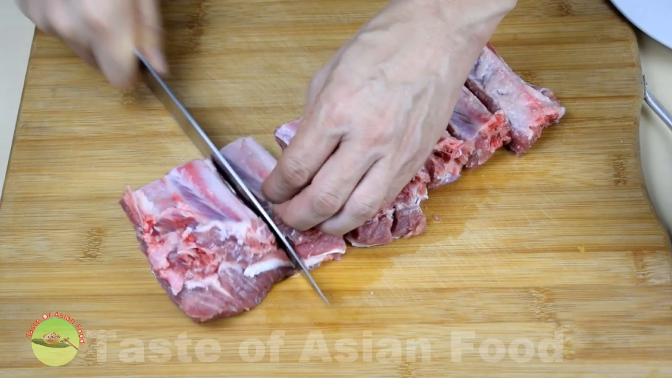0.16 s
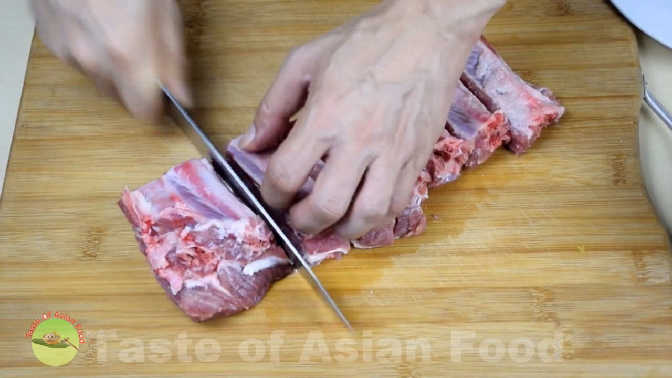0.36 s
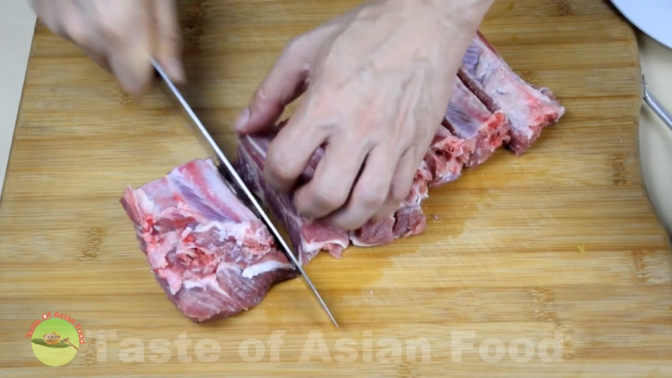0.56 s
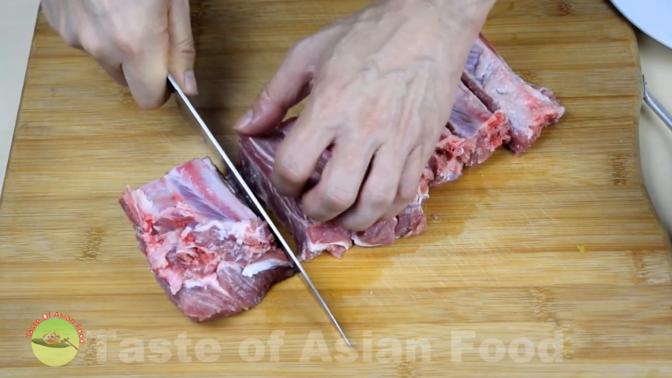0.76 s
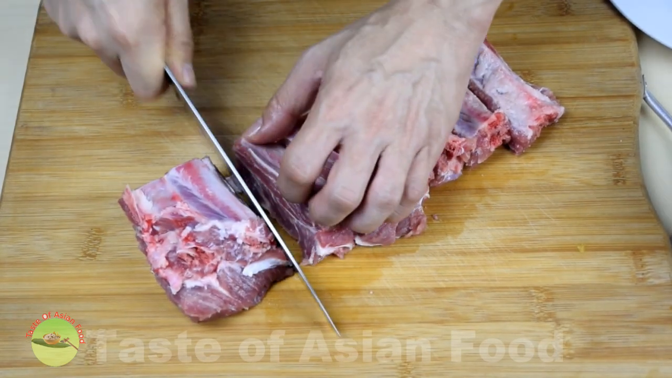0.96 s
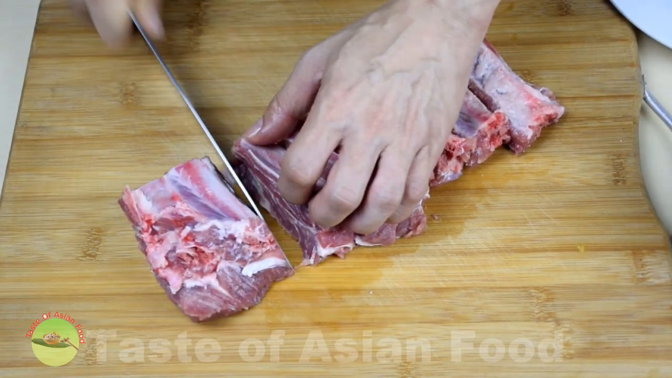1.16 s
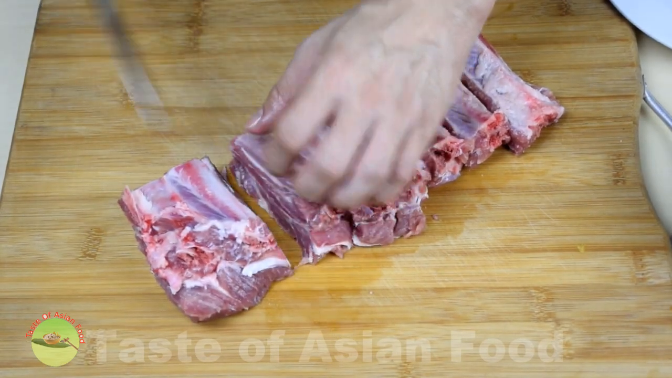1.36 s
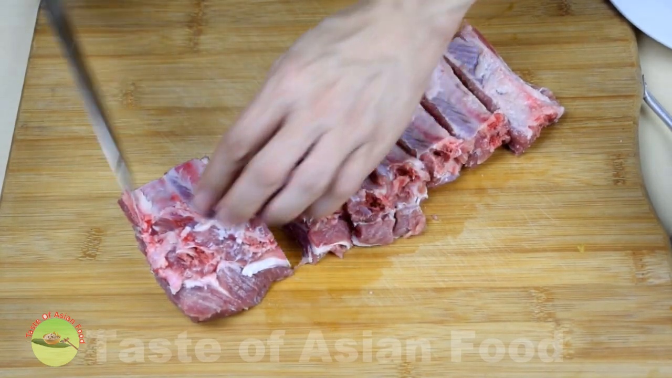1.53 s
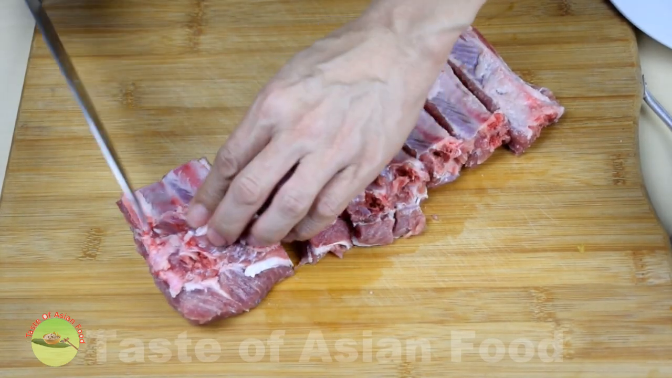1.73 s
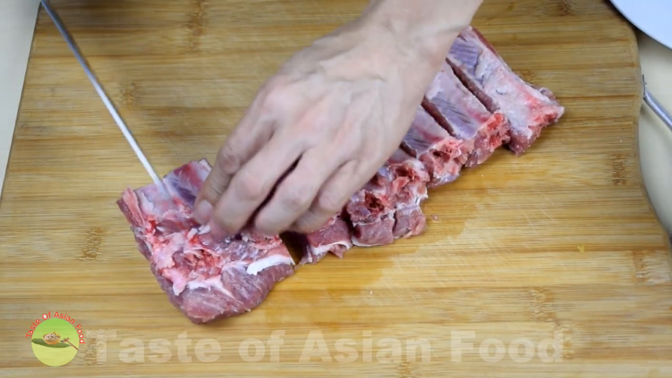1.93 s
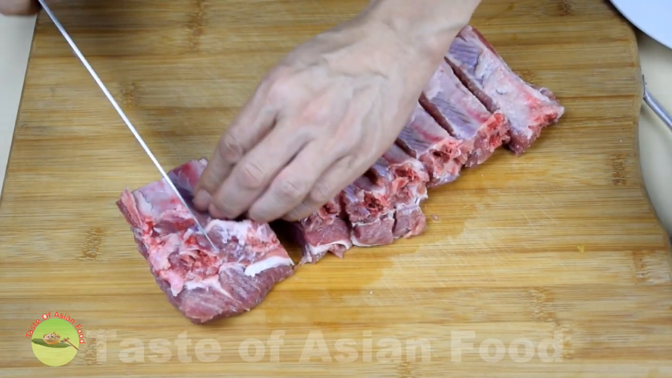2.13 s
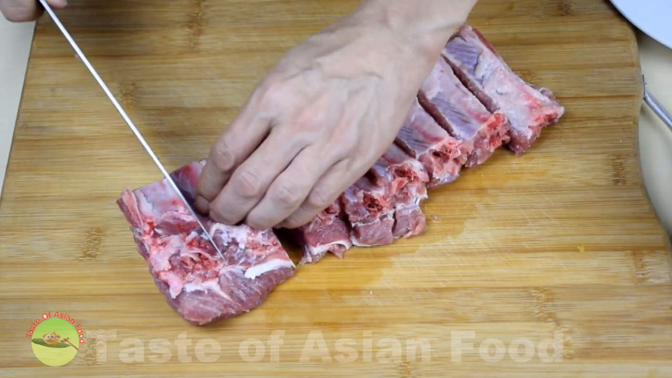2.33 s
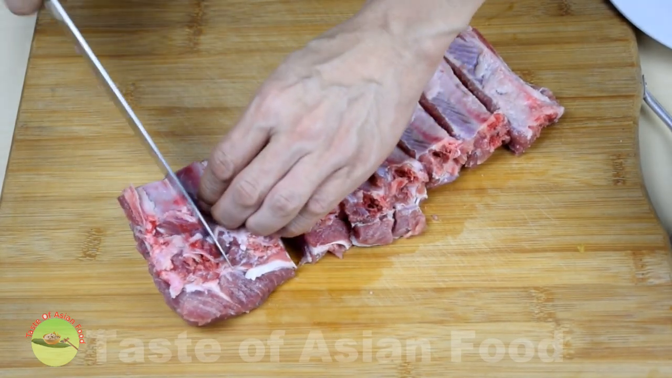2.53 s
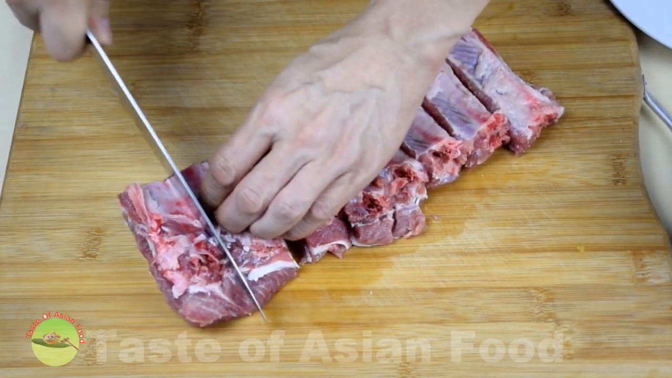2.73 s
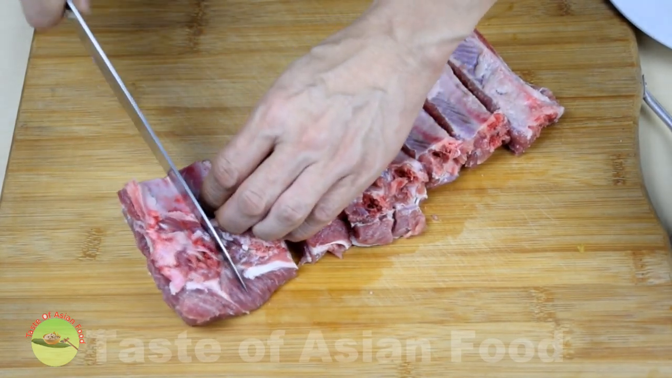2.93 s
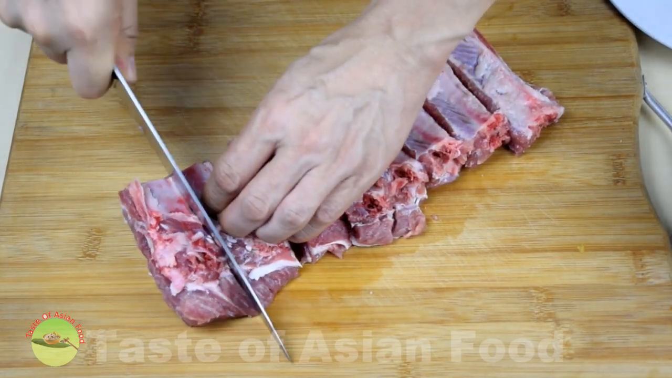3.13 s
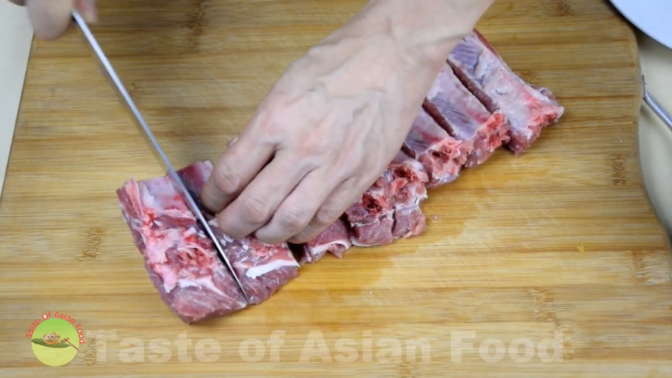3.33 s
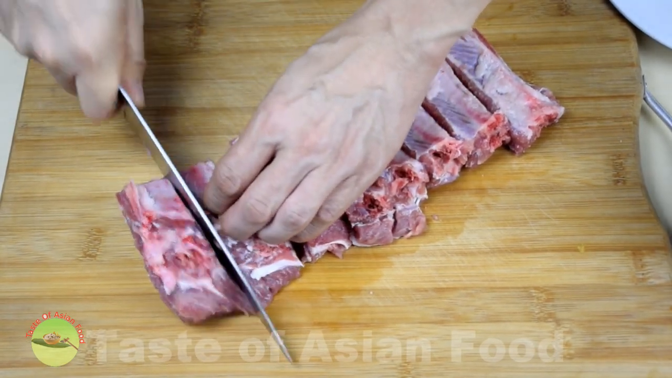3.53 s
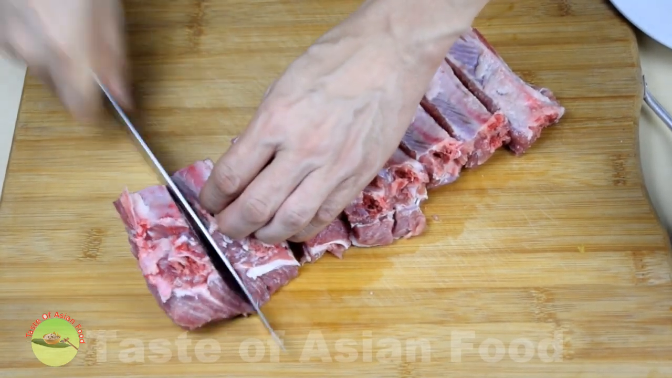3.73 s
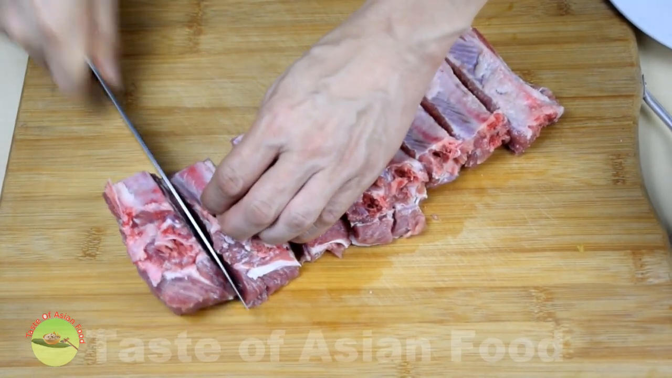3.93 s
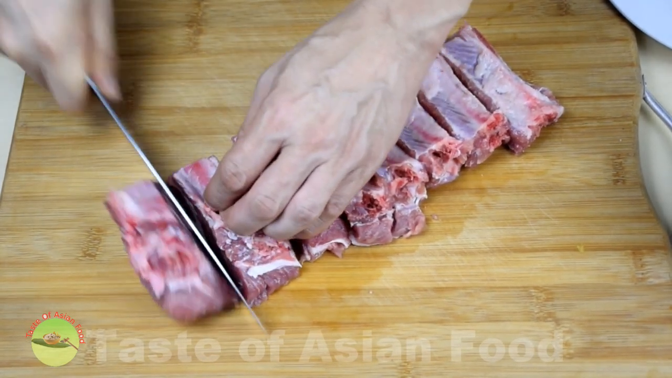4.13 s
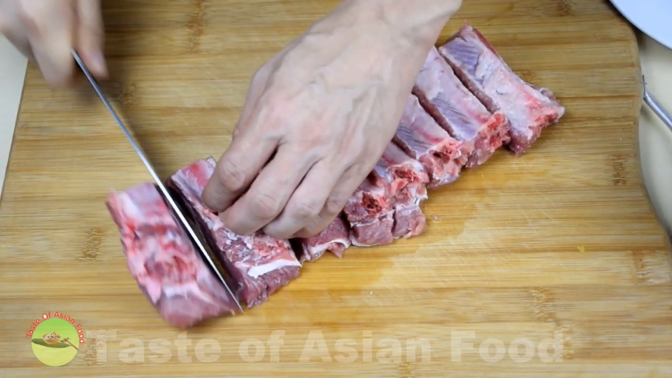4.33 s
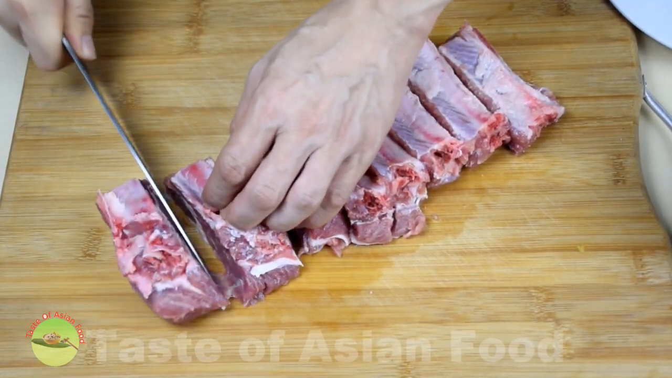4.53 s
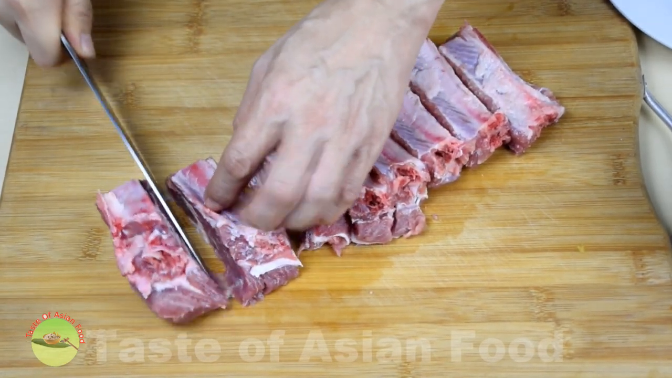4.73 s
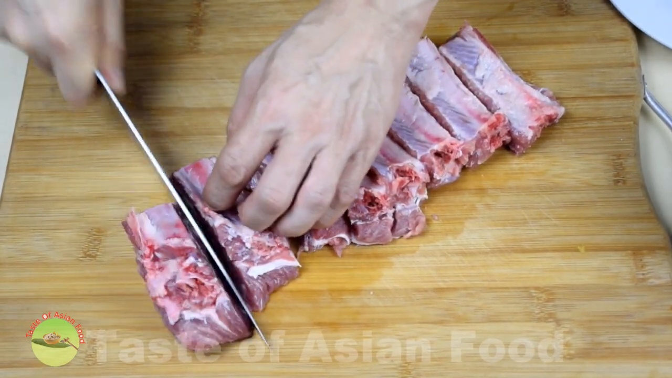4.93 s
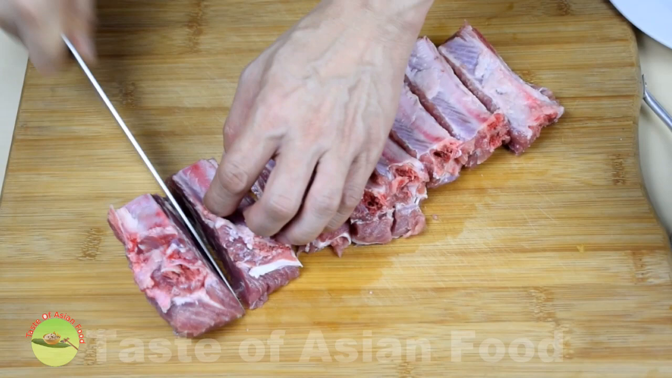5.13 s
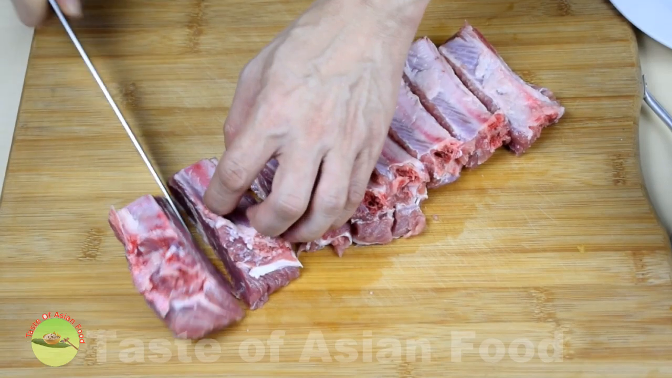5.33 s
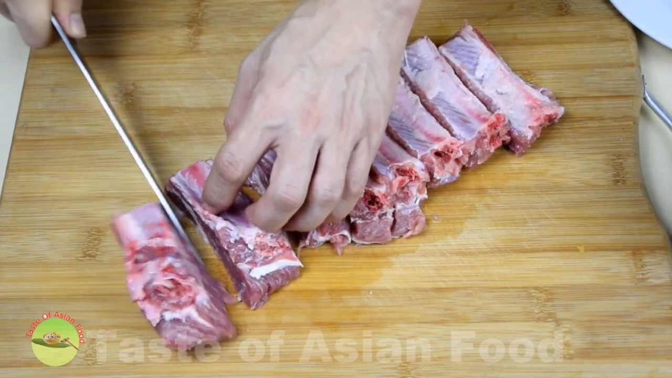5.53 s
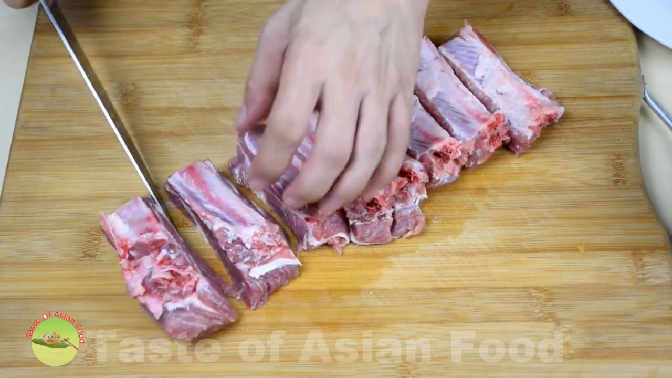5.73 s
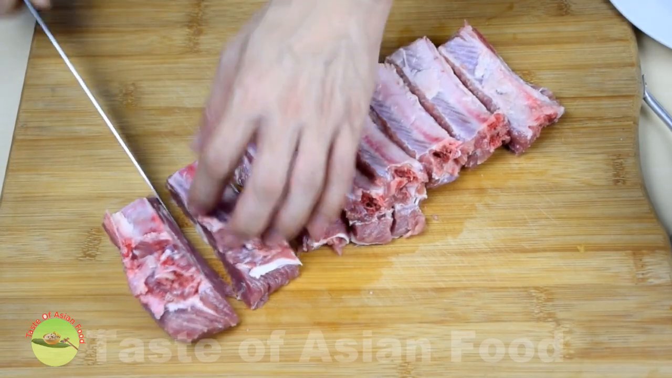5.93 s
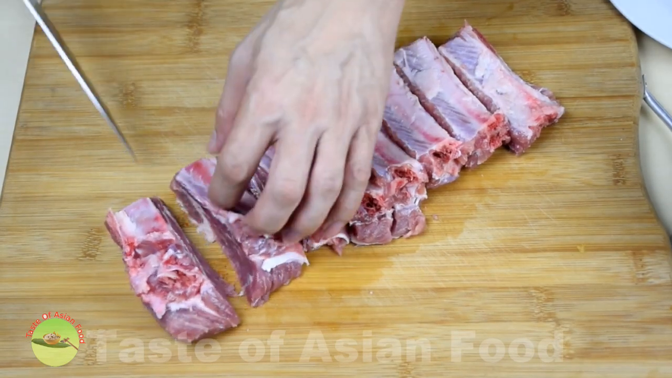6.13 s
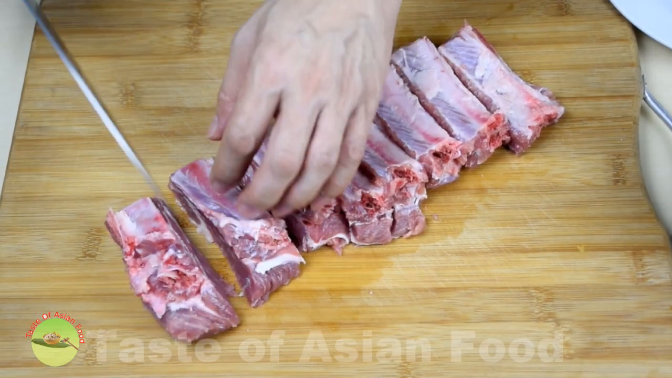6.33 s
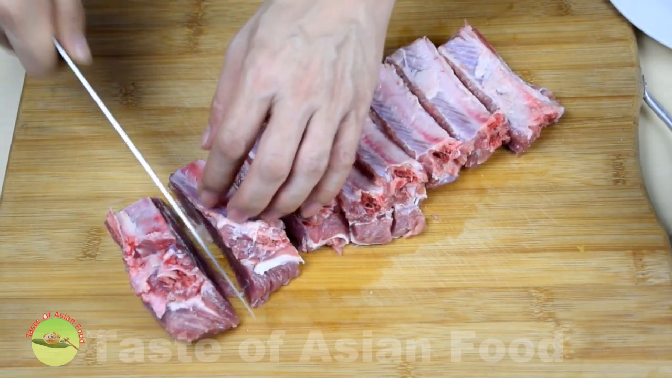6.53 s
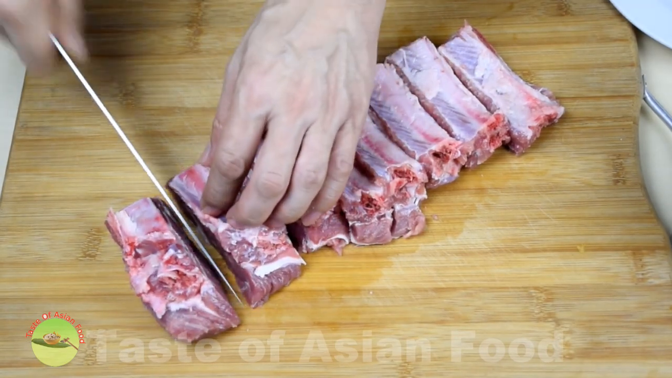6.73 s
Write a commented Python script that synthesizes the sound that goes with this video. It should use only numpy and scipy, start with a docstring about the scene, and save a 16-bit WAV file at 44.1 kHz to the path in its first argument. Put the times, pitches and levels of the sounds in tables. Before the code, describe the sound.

Very close and almost mono in a small quiet kitchen: a knife rasps back and forth through raw ribs on a wooden board, then lifts with a faint steely ring. After a near-silent gap with tiny wet ticks, the edge knocks the board, quick sawing resumes with sharp gristle snaps, strokes soften and slow, and a loud woody knock leads into one last long scrape.

```python
"""A kitchen knife saws through raw ribs on a wooden board, close to the microphone, almost in mono.
Friction noise, swelling with each stroke, excites the resonances of board, steel blade and table.
Damped oscillations make the gristle snaps, wet ticks, thumps, knocks on the board and freely ringing steel.
Shaped noise and unsteady sines make the quiet kitchen, with faint whistles far off.
A limiter ducks just after each overload and recovers slowly."""
import sys
import numpy as np
from scipy import signal
from scipy.fft import rfft, irfft, next_fast_len
from scipy.io import wavfile
from scipy.ndimage import uniform_filter1d, map_coordinates

SR = 44100
rng = np.random.default_rng(int(sys.argv[2]) if len(sys.argv) > 2 else 0)


def materialize(psi):
    """Save the field psi as 16-bit PCM at rate SR to the path in sys.argv[1].

    A 1-D psi becomes a single channel; in a 2-D psi each row is a channel.
    """
    bounded = np.clip(np.atleast_2d(psi).T, -1, 1)
    quanta = np.round(bounded * 32767).astype(np.int16)
    wavfile.write(sys.argv[1], SR, quanta)


N = 303000  # samples

# resonances of the wooden board: (frequency [Hz], bandwidth [Hz], relative level [dB])
BOARD_MODES = [(214, 150, -8), (457.8, 80, -1), (506.4, 183, -2), (643, 100, 1.5), (795, 150, -14.5),
               (779, 150, -5), (986, 136, -3.5), (1078, 173, -5.5), (1630, 365, -8.5), (2140, 212, -7.5),
               (2592, 400, -13.5)]
# resonances of the steel blade: (frequency [Hz], relative level when free [dB], t60 when free [s])
BLADE_MODES = [(3170, -6, .15), (3408, 0, .5), (3740, -1, .2), (4510, -8, .3), (5470, -8, .15),
               (6304, -3, .29), (7500, -8, .25), (9044, -4, .25), (10230, -6, .2), (11000, -7, .15),
               (12100, -9, .2)]
# spectrum of steel sliding on wood: (frequency [Hz], relative level per Hz [dB])
STEEL_HISS = [(1290, -37), (2200, -1.5), (2840, -3.5), (3100, 2), (3660, -1), (4640, 0.5), (6760, -1.5),
              (7520, 3), (15600, 2)]


def amp(db):
    """Decibels to amplitude ratio: 20 dB is a factor of ten."""
    return 10 ** (np.asarray(db) / 20)


def unit(x):
    """Normalization to an RMS amplitude of one."""
    return x / np.sqrt(np.mean(x ** 2) + 1e-20)


def along(points, hz):
    """Spectral envelope: (Hz, dB) points joined on a logarithmic frequency axis, as gain."""
    f, db = np.transpose(points)
    return amp(np.interp(np.log(hz + 1), np.log(f + 1), db))


def filtered(x, response):
    """Linear filtering: the spectrum of x times a complex response of frequency."""
    m = next_fast_len(N + SR // 2)
    spectrum = rfft(x, m) * response(np.fft.rfftfreq(m, 1 / SR))
    return irfft(spectrum, m)[..., :N]


def modes(table):
    """Modal superposition: causal response of (Hz, width Hz, dB) resonances with alternating signs."""
    def response(f):
        return sum((-1) ** k * amp(db) * 1j * f * width / (center ** 2 - f * f + 1j * f * width)
                   for k, (center, width, db) in enumerate(table))
    return response


def wobble(rate):
    """Slow random modulation: a smooth curve through rate random knots a second."""
    knots = rng.standard_normal(int(N * rate / SR) + 4)
    return map_coordinates(knots, [np.arange(N) * rate / SR])


def patchy(x, depth_db, bins, frames):
    """Time-variant transfer: random gain patches over time and frequency."""
    z = signal.stft(x, nperseg=512)[2]
    field = uniform_filter1d(rng.standard_normal(z.shape), size=bins, axis=0)
    field = uniform_filter1d(field, size=frames, axis=1)
    return signal.istft(z * amp(depth_db * unit(field)), nperseg=512)[1][:N]


def glide(x, depth, rate):
    """Frequency modulation: reading x at varying speed bends its resonances as the loaded length changes."""
    place = np.cumsum(1 + depth * wobble(rate))
    return map_coordinates(x, [place], mode="wrap")


def grit(rough_db, rate):
    """Dry friction: noise whose strength catches and slips."""
    return rng.standard_normal(N) * amp(rough_db * wobble(rate))


def add(x, s, piece):
    """Linear superposition: adds a piece to x at time s [s]."""
    x[round(s * SR):][:len(piece)] += piece


def push(hz, t60):
    """Heavily damped oscillation: a strong half swing and a weak swing back, peak 1."""
    t = np.arange(SR // 50) / SR
    p = np.sin(2 * np.pi * hz * t) * amp(-60 * t / t60) * (1 - np.exp(-t / 0.00015))
    return p / p.max()


def ping(hz, t60, attack):
    """Free damped oscillation: a sine that decays exponentially after a soft onset."""
    t = np.arange(SR // 2) / SR
    return np.sin(2 * np.pi * hz * t) * amp(-60 * t / t60) * (1 - np.exp(-t / attack))


def strokes():
    """Friction-driven resonance: the sliding edge excites board, steel and table, following hand speed."""
    # saw strokes: (start [s], length [s], fastest moment [0-1], board level [dB],
    # crunch: lift of the higher board modes [dB], steel level [dB], table level [dB])
    saw_strokes = [(0.0, 0.18, 0.01, -23.5, 2, -30.5, -33), (0.085, 0.2, 0.37, -22, -1.5, -31, -32.5),
                   (0.246, 0.21, 0.43, -25, -0.5, -29, -35.5), (0.434, 0.26, 0.25, -28.5, 2, -33.5, -44),
                   (0.61, 0.46, 0.29, -55, 7, -63, -46), (0.808, 0.54, 0.54, -27.5, 1.5, -32, -51.5),
                   (2.502, 0.3, 0.34, -50, 3, -45, -46.5), (2.742, 0.15, 0.47, -51.5, 1.5, -45.5, -56),
                   (2.901, 0.26, 0.46, -40, 1.5, -37.5, -35), (3.107, 0.25, 0.35, -51, -3, -42, -46.5),
                   (3.316, 0.18, 0.12, -45, -7, -38.5, -34.5), (3.386, 0.13, 0.32, -32, 5.5, -41, -57),
                   (3.487, 0.17, 0.51, -42, 1, -39, -38.5), (3.632, 0.17, 0.55, -26.5, 3.5, -32.5, -35.5),
                   (3.781, 0.19, 0.4, -22, 4.5, -28, -30), (3.926, 0.18, 0.41, -25.5, 2, -34, -36),
                   (4.074, 0.17, 0.43, -25, -3, -32.5, -39.5), (4.214, 0.17, 0.36, -29.5, 1.5, -37, -40),
                   (4.347, 0.16, 0.35, -31.5, -1, -35, -35), (4.492, 0.14, 0.32, -32.5, 0, -45, -45),
                   (4.601, 0.16, 0.49, -35, -2.5, -44, -44.5), (4.743, 0.12, 0.17, -33, -0.5, -42.5, -65),
                   (4.857, 0.16, 0.15, -31, 5.5, -34.5, -38.5), (4.977, 0.32, 0.39, -30, 6, -32, -43.5),
                   (5.241, 0.18, 0.37, -27.5, -3.5, -42, -48.5), (5.453, 0.06, 0.52, -30.5, -3, -48, -31.5),
                   (5.473, 0.24, 0.47, -30.5, 0.5, -33.5, -41.5), (5.687, 0.18, 0.43, -36.5, 2, -47, -48.5),
                   (5.842, 0.35, 0.32, -26.5, -1, -31.5, -46.5), (6.579, 0.48, 0.44, -26, 3, -29.5, -39.5)]
    # powers of each stroke's swell before the length factor, one per driven part [no unit]:
    # low, middle, upper board modes, steel, steel treble, table, singing blade
    steepness = [1.75, 1.39, 1.38, 1.64, 1.55, 0.63, 1.3]
    middle_db, upper_db = -4, -9  # middle and upper board modes against the low ones
    # steel treble against the steel at a firm stroke; dB brighter per dB louder
    treble_offset_db, treble_grows, firm_db = -7.5, 0.35, -26.5
    sing_offset_db, sing_db_per_s = -10, 24  # the blade sings more in a longer draw
    usual_s, peaked = 0.15, 0.43  # a draw longer than usual swells to a sharper peak
    # gripped by meat, the blade sings best near here
    held_hz, held_db_per_octave, held_q = 5200, -9, 70

    drive = np.zeros((len(steepness), N + SR))
    for s, length, fastest, board_db, crunch_db, steel_db, table_db in saw_strokes:
        # warp time so that the swell peaks at the fastest moment
        warp = np.log(.5) / np.log(np.clip(fastest, .02, .95))
        u = np.linspace(0, 1, round(length * SR)) ** warp
        higher_db = board_db + crunch_db
        treble_db = steel_db + treble_offset_db + treble_grows * (steel_db - firm_db)
        sing_db = steel_db + sing_offset_db + sing_db_per_s * length
        levels = [board_db, higher_db + middle_db, higher_db + upper_db, steel_db, treble_db, table_db, sing_db]
        powers = np.array(steepness) * (length / usual_s) ** peaked
        swell = np.abs(np.sin(np.pi * u))[:, None] ** powers
        add(drive.T, s, swell * amp(levels))

    # the contact point moves, so the board's resonances shift in patches
    board_parts = (BOARD_MODES[1:5], BOARD_MODES[5:8], BOARD_MODES[8:])
    scrape = [glide(filtered(grit(2.84, 120), modes(part)), .03, 6) for part in board_parts]
    wood = [unit(patchy(x, 1.8, bins=2, frames=10)) for x in scrape]

    # held by meat and wood, the blade's modes widen, wander in pitch and come and go over the hiss
    held_modes = [(hz, hz / held_q, held_db_per_octave * abs(np.log2(hz / held_hz)))
                  for hz, _, _ in BLADE_MODES]
    sing = glide(filtered(rng.standard_normal(N), modes(held_modes)), .022, 6)
    sing = unit(patchy(sing, 4.5, bins=5, frames=12))

    hiss = filtered(grit(1, 120), lambda f: along(STEEL_HISS, f))
    hiss = patchy(hiss, 2, bins=6, frames=14)
    treble_part = lambda f: 1 / (1 + (8000 / (f + 1)) ** 6)
    steel = [unit(filtered(hiss, lambda f: 1 - treble_part(f))), unit(filtered(hiss, treble_part))]

    table_modes = [(115, 36, -1), (196, 62, -1.0), (251, 131, -4.5)]  # Hz, width Hz, dB
    table = unit(filtered(grit(2.9, 25), modes(table_modes)))
    return (drive[:, :N] * np.array(wood + steel + [table, sing])).sum(axis=0)


def room(x, t60):
    """Reverberation: convolution with decaying, dulled noise gives a short dull answer."""
    t = np.arange(SR // 2) / SR
    decay = rng.standard_normal(len(t)) * amp(-60 * t / t60)
    delayed = np.pad(decay, (130, N))  # 130 samples before the answer
    tail = filtered(delayed, lambda f: 1 / (1 + (f / 2800) ** 4))
    return signal.fftconvolve(x, tail[:SR] / np.linalg.norm(tail))[:N]


def kitchen():
    """Stationary noise and modulated tones: room noise, unsteady hum and faint whistles."""
    # room noise spectrum: (frequency [Hz], relative level per Hz [dB])
    room_noise = [(15, -35), (25, -35), (108, -1.5), (166, -9), (326, -11.5), (363, -8), (439, -12.5),
                  (531, -11), (659, -13.5), (1040, -15), (2000, -20.5), (2220, -23.5), (16000, -28)]
    # appliance lines: (frequency [Hz], middle level [dB])
    hum_lines = [(49, -47.5), (102, -56), (199, -57.5)]
    # thin faint whistles far off, around which pitch and level waver:
    # (start [s], end [s], first frequency [Hz], last frequency [Hz], level [dB])
    whistles = [(6.11, 6.37, 2740, 2640, -55), (6.38, 6.5, 4800, 4950, -57), (6.36, 6.44, 1950, 2030, -53)]
    noise_db = -45.5  # RMS

    t = np.arange(N) / SR
    noise = filtered(rng.standard_normal(N), lambda f: along(room_noise, f))
    x = amp(noise_db) * unit(patchy(noise, 1.0, bins=6, frames=14))
    for hz, db in hum_lines:
        x += amp(db + 2.5 * wobble(14)) * np.sin(2 * np.pi * hz * t + 1.2 * wobble(12))
    for start, end, first_hz, last_hz, db in whistles:
        u = np.clip((t - start) / (end - start), 0, 1)
        hz = first_hz + (last_hz - first_hz) * u + 25 * wobble(90)
        phase = 2 * np.pi * np.cumsum(hz) / SR
        envelope = np.sqrt(np.abs(np.sin(np.pi * u))) * (u < 1)
        x += amp(db + 4 * wobble(50)) * envelope * np.sin(phase)
    return x


def meat():
    """Impulsive release and damped oscillation: dry gristle snaps, tiny wet ticks and soft thumps."""
    # gristle lets go, a dry push with no ring: (time [s], level [dB])
    snaps = [(0.0926, -5.5), (.19, -5.5), (.416, -18.5), (3.8768, 13), (3.9739, 6), (4.0642, 0.5),
             (4.259, 1.5), (4.769, -15)]
    # wet meat unsticks from fingers and steel: (time [s], strength [dB], pitch [Hz])
    ticks = [(1.7296, -12.5, 5800), (1.758, -21, 7250), (1.8696, -26, 6900), (2.2159, -32, 11400),
             (2.463, -23, 10500), (2.4773, -20, 10500), (2.485, -15, 10400), (2.4983, -15.5, 5500),
             (2.5154, -17, 9000), (2.556, -17, 5000), (3.3147, -18, 4340), (3.6588, -9, 3100)]
    # soft pushes of hand and meat on the table, and at 6.547 s the low thud under the last knock: # (time [s],
    # strength [dB], pitch [Hz])
    thumps = [(2.574, -23, 124.5), (2.647, -36, 118), (2.931, -32, 172), (2.988, -17.5, 153),
              (3.008, -20, 124), (3.33, -26, 182), (3.658, -16.5, 191.4), (6.547, -5.5, 198)]
    snap_hz, thump_cycles = 770, 28  # Hz; swings until a thump has died away by 60 dB

    x = np.zeros(N + SR)
    for s, db in snaps:
        add(x, s, amp(db) * push(snap_hz, t60=0.0032))
    for s, db, hz in ticks:
        add(x, s, amp(db) * ping(hz, t60=0.0012, attack=.0001))
    for s, db, hz in thumps:
        add(x, s, amp(db) * ping(hz, thump_cycles / hz, attack=0.0016))
    return x[:N]


def blade():
    """Free vibration after release: a last quick rasp stops dead and the unloaded steel rings."""
    # the blade flicks off the wood:
    # (end of rasp [s], flick level [dB], ring level [dB], ring tilt [dB per octave])
    lifts = [(.59, -42, -54, 0), (1.212, -29, -36, -9), (6.068, -34, -47, 8)]
    rasp, ring = np.zeros(N), np.zeros(N + SR)
    rise = np.linspace(0, 1, round(.06 * SR))
    for s, flick_db, ring_db, tilt_db in lifts:
        add(rasp, s - len(rise) / SR, amp(flick_db) * rise)
        for hz, level, t60 in BLADE_MODES:
            # each mode rings at a slightly random strength
            mode_db = ring_db + level + tilt_db * np.log2(hz / 3400) + rng.normal(0, 1.4)
            add(ring, s - .03, amp(mode_db) * ping(hz, t60, attack=0.0026))  # sets in under the rasp
    hiss = filtered(rng.standard_normal(N), lambda f: along(STEEL_HISS, f))
    hiss = patchy(hiss, 4.9, bins=3, frames=8)
    return rasp * unit(hiss) + ring[:N] * amp(0.97 * wobble(27.5))


def knocks():
    """Impact excitation: a downward push and short crack, the board's modal ring, a brief rattle of the board."""
    # the edge lands on the board:
    # (time [s], push level [dB], ring against the push [dB], rattle start level [dB])
    landings = [(3.0319, 6, -3.5, -21.5), (3.3679, 1.5, -10, -28), (3.675, -2.5, -19, -28.5),
                (6.544, 3.5, 4, -10)]
    # the crack follows the strength of the ring, in dB per dB
    knock_hz, crack_offset_db, crack_grows = 676, -5.5, 0.5

    x, shake = np.zeros(N + SR), np.zeros(N + SR)
    t = np.arange(SR // 4) / SR
    for s, db, ring_db, rattle_db in landings:
        # every mode rings at a slightly random strength
        ring = sum(amp(level + rng.normal(0, 0.5)) * np.exp(-np.pi * width * t) * np.sin(2 * np.pi * hz * t)
                   for hz, width, level in BOARD_MODES)
        ring = amp(db + ring_db) * ring * (1 - np.exp(-t / 0.0049))
        crack_db = crack_offset_db + crack_grows * (db + ring_db) - 60 * t / 0.012
        crack = amp(crack_db) * uniform_filter1d(rng.standard_normal(len(t)), size=9)
        add(x, s, crack - ring)
        add(x, s, -amp(db) * push(knock_hz, t60=0.012))
        add(shake, s, amp(rattle_db - 60 * t / 0.21))
    rattle = unit(filtered(grit(2, 200), modes(BOARD_MODES[7:])))
    return x[:N] + shake[:N] * rattle


def scene():
    """Superposition of direct and reverberant sound in two channels."""
    # faint steady hiss, opposite in sign in the two channels: (frequency [Hz], relative level per Hz [dB])
    opposed_hiss = [(35, -46), (60, -16), (98, 3), (267, -9), (10900, -8.5), (15800, 0)]
    opposed_hiss_db = -60.5  # RMS
    saw = strokes()
    blows = knocks()
    near = blows + amp(-18.5) * room(blows, t60=0.48) + meat()
    # thin out the deep bass of knocks, snaps, ticks and thumps
    near = filtered(near, lambda f: 1j * f / (90 + 1j * f))
    mid = saw + amp(-13.5) * room(saw, t60=0.2) + blade() + near + kitchen()
    # the channels differ only by this hiss
    hiss = filtered(rng.standard_normal(N), lambda f: along(opposed_hiss, f))
    side = amp(opposed_hiss_db) * unit(hiss)
    return np.array([mid + side, mid - side])


def record(dry):
    """Dynamic compression: gain ducks just after an overload, recovers slowly; the first swing clips softly."""
    attack_s, release_s, top_hz = 0.00039, .06, 15950
    over = np.clip(np.abs(dry).max(axis=0) - .7, 0, None)
    attack, release = np.exp(-1 / (attack_s * SR)), np.exp(-1 / (release_s * SR))
    held = signal.lfilter([1], [1, -release], over)
    held = signal.lfilter([1 - attack], [1, -attack], held)
    wet = dry / (1 + 0.046 * held)
    wet = wet / (1 + np.abs(wet) ** 6) ** (1 / 6)  # soft clipping towards 1
    return filtered(wet, lambda hz: hz < top_hz)


dry = scene()
out = record(dry)
materialize(out)
```